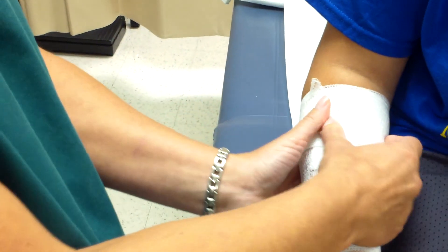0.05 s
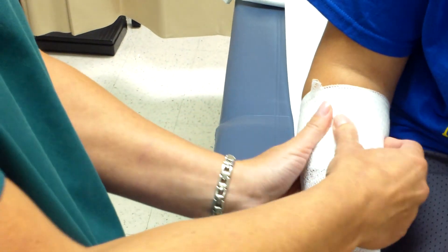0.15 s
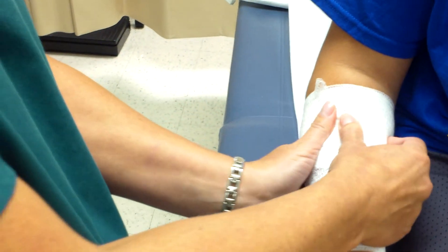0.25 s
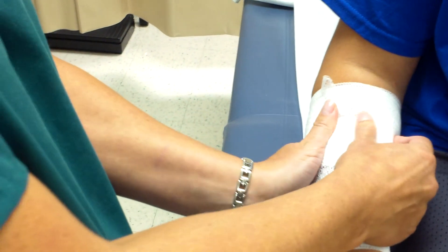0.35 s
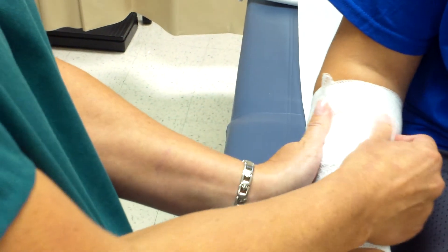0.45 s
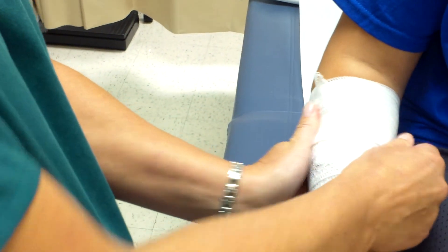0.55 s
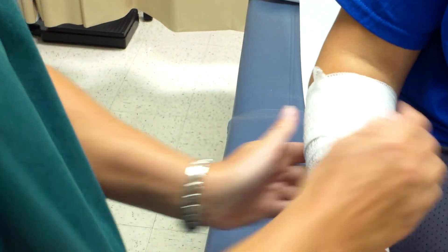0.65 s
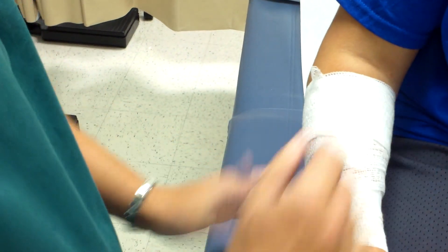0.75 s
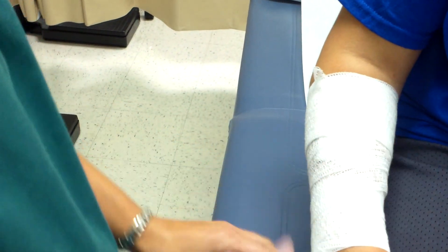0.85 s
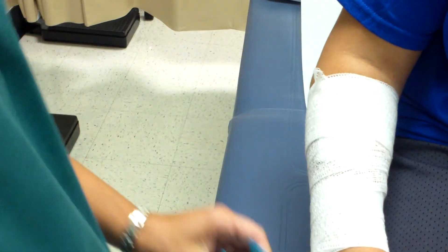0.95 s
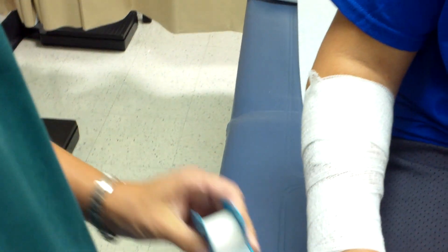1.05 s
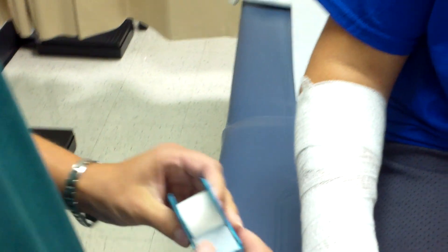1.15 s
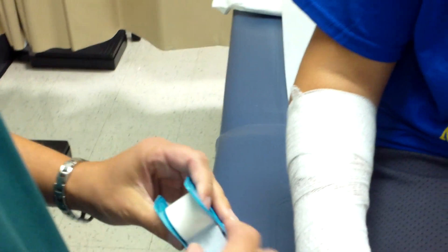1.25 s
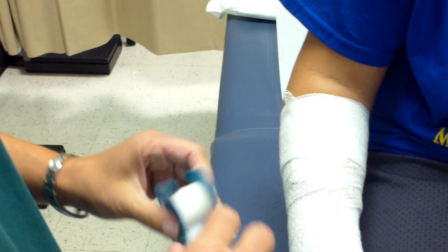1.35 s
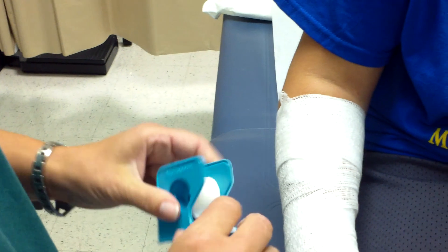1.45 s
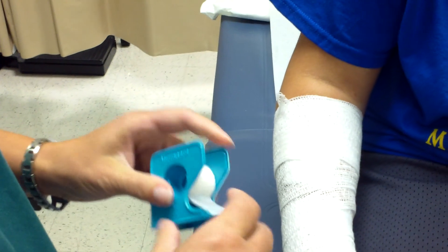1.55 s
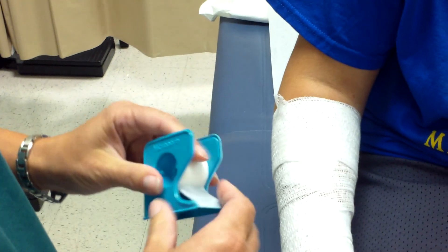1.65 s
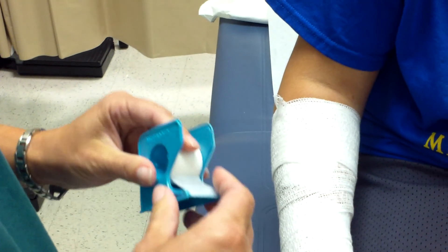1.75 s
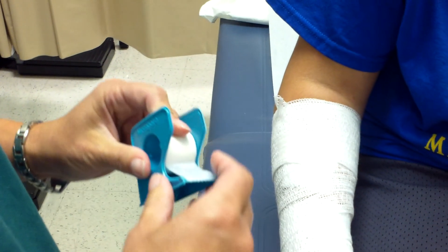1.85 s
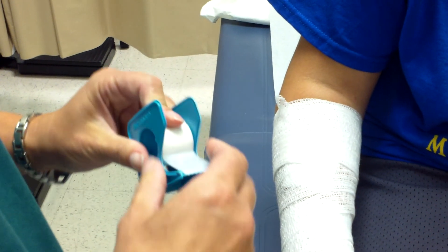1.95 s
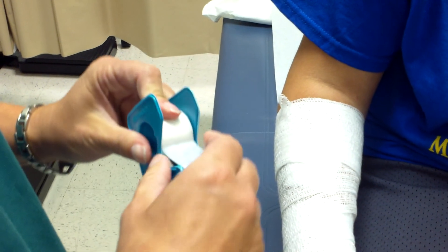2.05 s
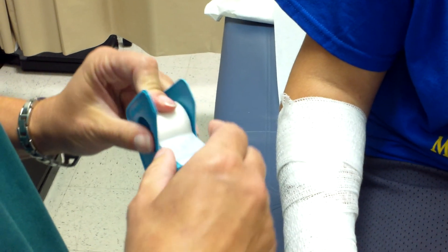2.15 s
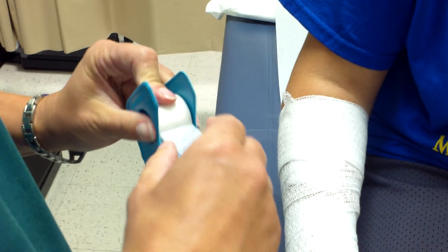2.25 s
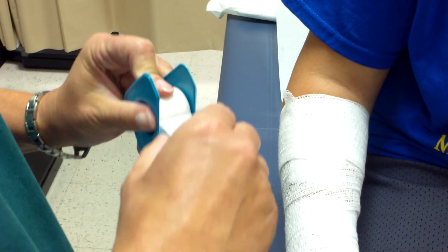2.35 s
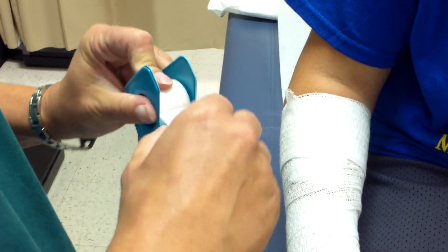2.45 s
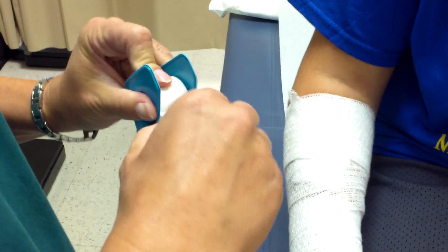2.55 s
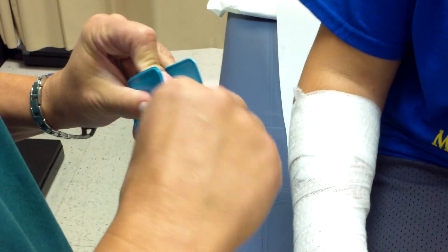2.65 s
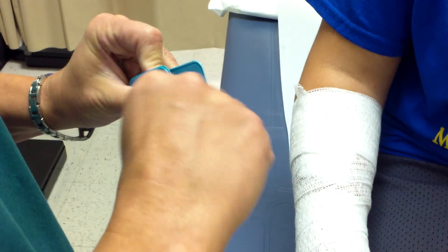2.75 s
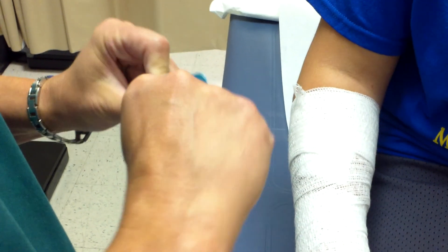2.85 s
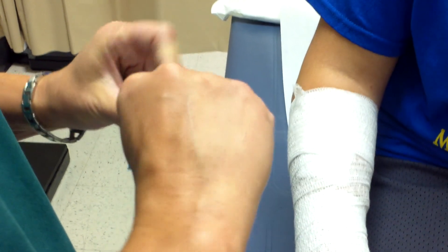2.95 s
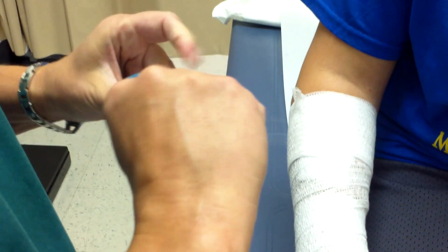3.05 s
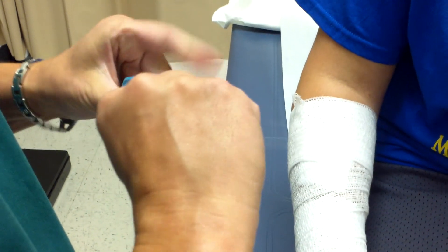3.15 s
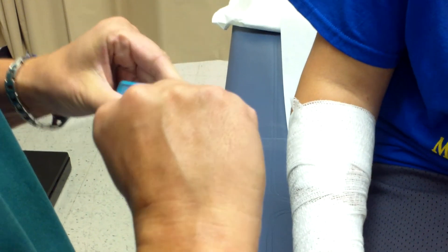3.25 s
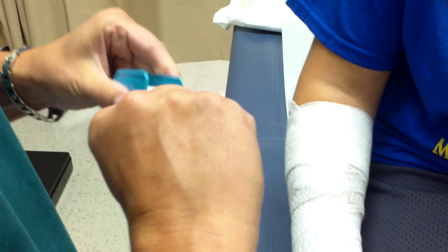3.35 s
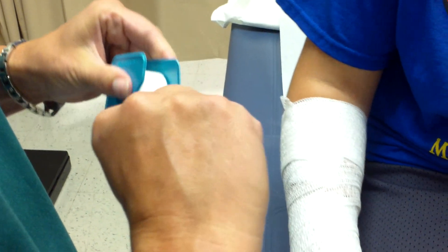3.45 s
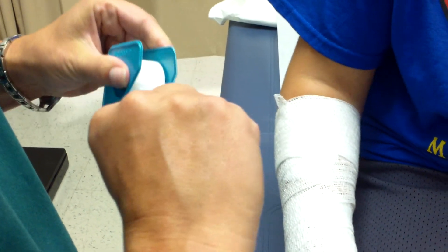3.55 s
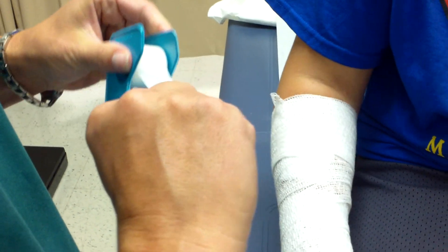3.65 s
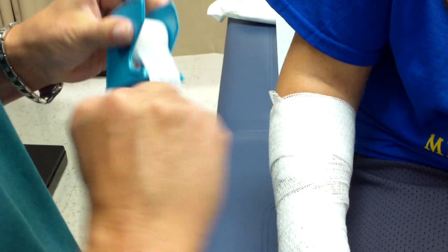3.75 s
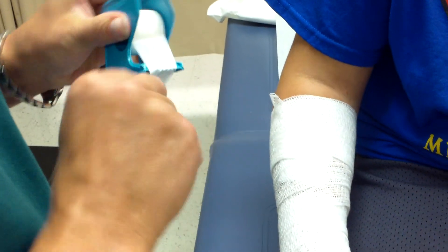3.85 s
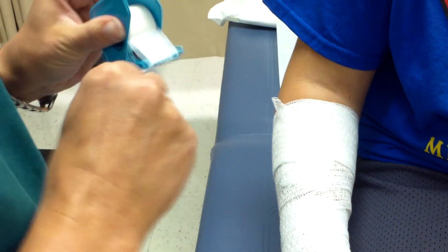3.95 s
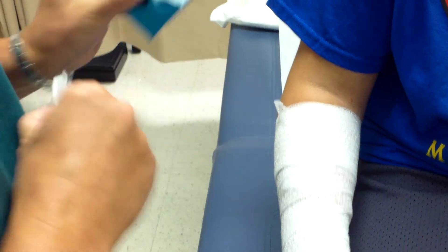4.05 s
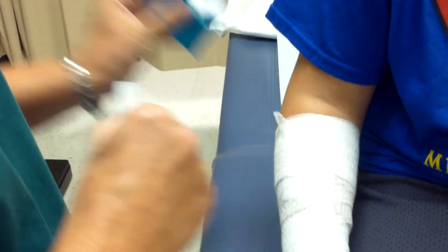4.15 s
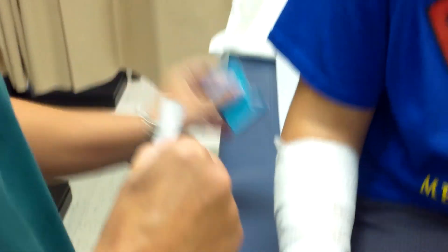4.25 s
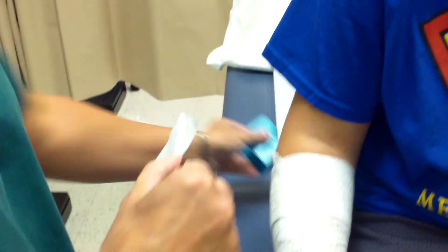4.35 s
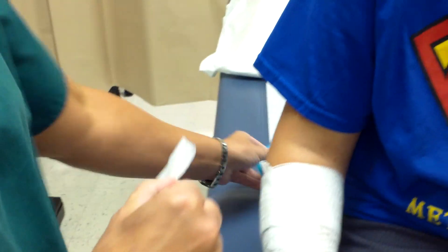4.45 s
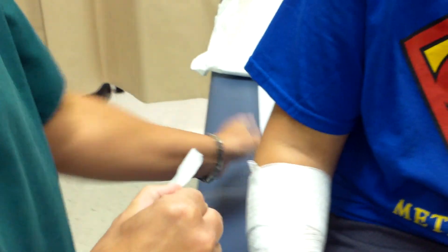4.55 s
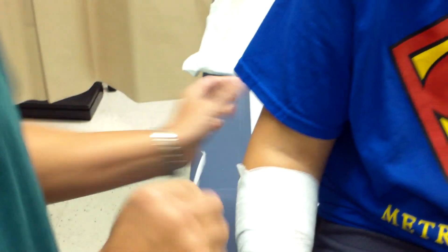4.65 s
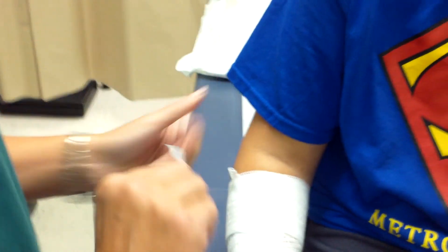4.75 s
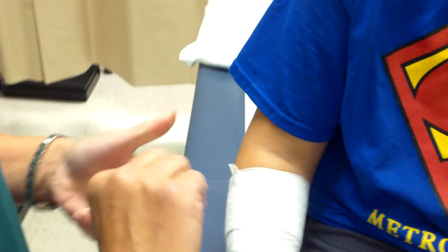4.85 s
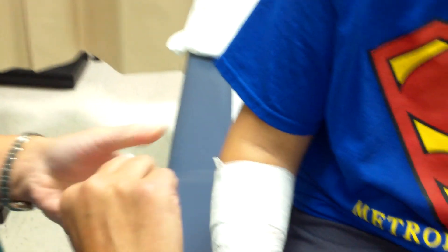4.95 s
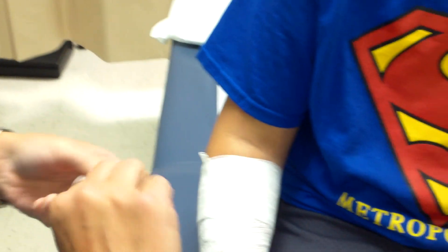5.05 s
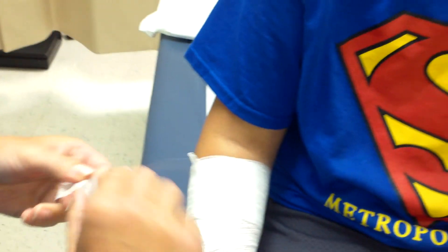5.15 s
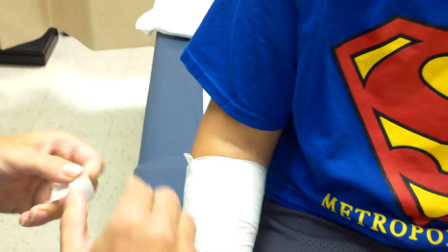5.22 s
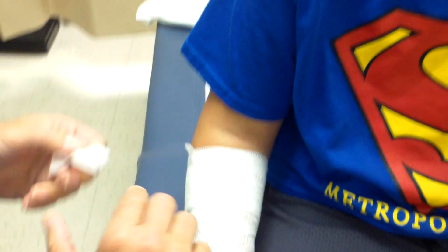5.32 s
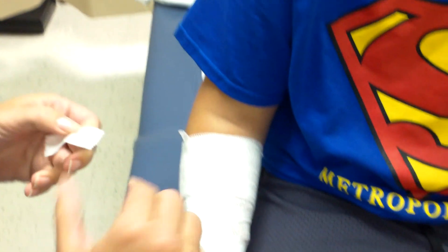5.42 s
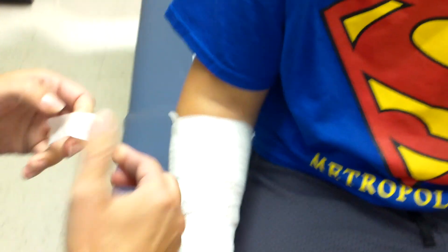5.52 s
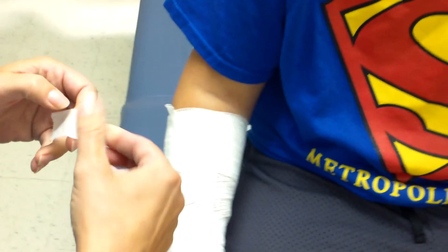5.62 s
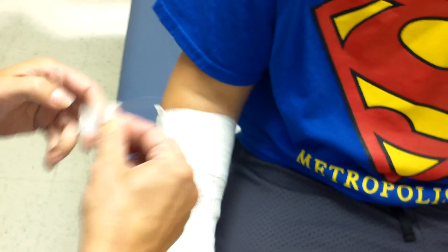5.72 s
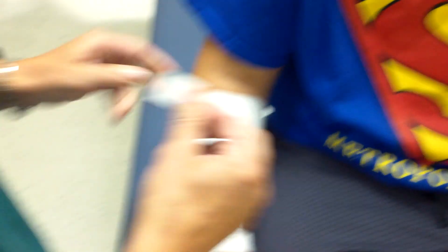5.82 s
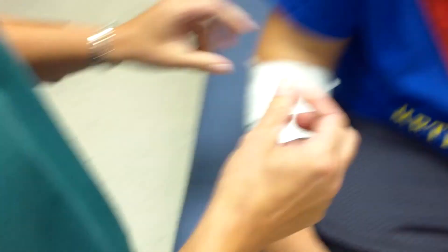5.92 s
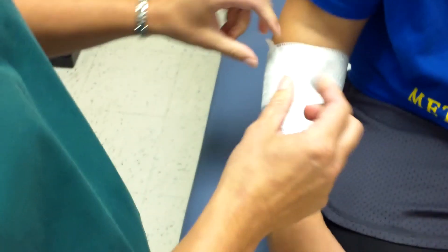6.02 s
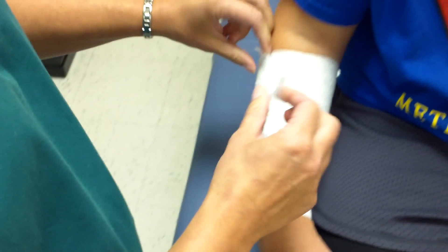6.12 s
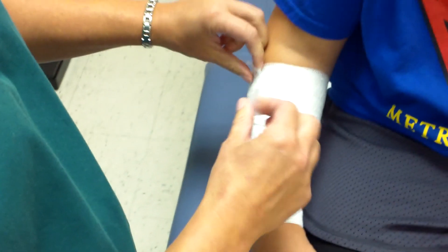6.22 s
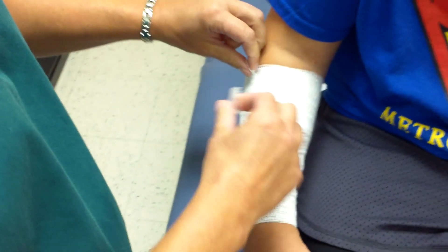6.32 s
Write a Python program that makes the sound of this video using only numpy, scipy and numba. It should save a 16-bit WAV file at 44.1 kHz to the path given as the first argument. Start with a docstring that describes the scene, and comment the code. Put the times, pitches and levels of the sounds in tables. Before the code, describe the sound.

Skin brushes gauze, a plastic dispenser clicks, sticky tape peels in rasping jerks and snaps off, followed by crinkles, scuffs and close dull thumps.

```python
"""Gauze, tape peel and snap

Close hands in a small, quiet, ventilated room: skin strokes gauze, a sleeve swishes, a plastic dispenser clicks.
Adhesive crackles in jerks and shakes the tape span; teeth tear the strip and ring the dispenser body.
Padding scuffs, creases pop, fingers squeak, a hollow thing bumps and dull knocks fall close by.
In mono on a hand-held camera microphone, whose limiter ducks for half a second after the snap."""
import sys
import numpy as np
from scipy import signal
from scipy.fft import rfft, irfft
from scipy.io import wavfile
from scipy.ndimage import uniform_filter1d, minimum_filter1d
from numba import njit

SR = 44100
rng = np.random.default_rng(int(sys.argv[2]) if len(sys.argv) > 2 else 0)


def output_pcm(signal):
    """Save a mono or channel-first signal as 16-bit PCM at the path in sys.argv[1].

    Samples are clipped to [-1, 1] before scaling.
    """
    pcm = np.clip(np.atleast_2d(signal).T, -1, 1) * 32767
    wavfile.write(sys.argv[1], SR, np.round(pcm).astype(np.int16))


N = 281336
TIME = np.arange(N) / SR

# All levels are relative: mixing, colouring and the microphone chain follow.
# Ventilation spectrum: pitch_hz [Hz], level_db [dB per Hz]
VENTILATION_SPECTRUM = [(20, -10.5), (45, -6), (65, -16.5), (125, -12), (200, -15), (400, -22), (700, -26),
                        (1900, -31), (4500, -34), (9500, -38.5), (12000, -41), (16000, -42)]
# low rumble of the microphone chain: pitch_hz [Hz], level_db [dB per Hz]
RUMBLE_SPECTRUM = [(10, -1.5), (25, -5.5), (42, 2.5), (60, -19), (120, -9.5), (400, -46), (2000, -81.5)]
# microphone port resonances: pitch_hz [Hz], width_hz [Hz], level_db [dB]
PORT_RESONANCES = [(6810, 310, 3), (8030, 570, -3.5), (9350, 700, 5)]
# dull knocks: start_s [s], contact_db [dB], thump_db [dB], thump_hz [Hz], ring_db [dB], ring_hz [Hz], t60_s [s]
KNOCKS = [(3.777, -38, -52, 200, -34, 825, 0.023), (4.9436, -34, -48, 198, -10.5, 1445, 0.021),
          (5.2495, -25, -16.5, 247, -11.5, 730, 0.011), (5.3736, -24, -17, 171, -11, 1620, 0.0092),
          (5.505, -25.5, -8.5, 98, -16.5, 1714, 0.02)]
# spectrum of the hollow bump: pitch_hz [Hz], level_db [dB per Hz]
HOLLOW_SPECTRUM = [(80, -11), (200, 1), (320, -14), (430, 7), (560, -10), (800, 5.5), (1300, -3.5),
                   (2500, -15), (6000, -20), (16000, -28)]
# drag of the hollow thing: fastest_s [s], level_db [dB], half_length_s [s]
BUMP_DRAG = [(1.875, -43, .025), (1.96, -44.5, 0.11)]
# scuffs of hands, cloth and dispenser on padding:
# peak_s [s], level_db [dB], rise_s [s], fall_s [s], tilt_db [dB per octave above 800 Hz]
SCUFFS = [(1.878, -42, 0.018, 0.03, -4), (3.775, -43, 0.0068, 0.018, 0), (3.92, -48.5, 0.081, 0.17, -0.5),
          (4.5646, -30, 0.0042, 0.017, 1), (4.576, -32, 0.0053, 0.021, 1.5),
          (4.634, -29.5, 0.00077, 0.0041, -3), (4.66, -26, 0.0035, 0.012, -0.5),
          (4.67, -30, 0.0067, 0.027, -1), (5.765, -34.5, 0.0037, 0.011, 0)]
# padding spectrum: pitch_hz [Hz], level_db [dB per Hz]
PADDING_SPECTRUM = [(60, 8.5), (300, 3), (650, 3.5), (1100, -6), (2000, -1), (4000, -6), (10000, -3.5),
                    (12500, -16.5), (16000, -29.5)]
# the palm strokes the gauze: fastest_s [s], level_db [dB], half_length_s [s], brightness_db [dB above 8 kHz]
GAUZE_STROKES = [(0.033, -50, 0.17, 5), (0.194, -36, 0.019, -4.5), (0.414, -37, 0.035, -6),
                 (0.53, -35, 0.04, 2.5), (0.645, -42, 0.22, 3.5)]
# gauze weave spectrum: pitch_hz [Hz], level_db [dB per Hz]
GAUZE_SPECTRUM = [(1000, -17), (2500, -6.5), (4500, 0.5), (7000, 3), (10000, 2), (12000, -7), (16000, -17)]
# the sleeve swishes as the arm swings: fastest_s [s], level_db [dB], half_length_s [s]
SLEEVE_SWISHES = [(.02, -51, 0.15), (.76, -46, 0.095), (.96, -48.5, 0.092)]
# sleeve cloth spectrum: pitch_hz [Hz], level_db [dB per Hz]
SLEEVE_SPECTRUM = [(150, 6), (600, 3.5), (2000, 4.5), (4000, 2), (8000, -2.5), (16000, -45)]
# fingers shift their grip on dispenser or strip: fastest_s [s], level_db [dB], half_length_s [s]
GRIP_RUBS = [(1.1, -52.5, 0.24), (1.41, -38.5, 0.013), (1.52, -46.5, 0.0089), (1.623, -39.5, 0.018),
             (1.71, -38.5, 0.0082), (1.97, -49.5, 0.18), (2.33, -50.5, 0.16), (2.65, -47.5, 0.029),
             (3.75, -47.5, 0.18), (3.87, -41.5, .022), (3.998, -40.5, 0.022), (4.7, -48.5, 0.2),
             (5.37, -47, 0.06), (5.55, -46, 0.025), (5.77, -45.5, 0.041)]
# skin spectrum: pitch_hz [Hz], level_db [dB per Hz]
SKIN_SPECTRUM = [(300, -40), (1500, 1), (3200, -2), (5000, -4.5), (10000, -0.5), (12000, -5.5),
                 (16000, -31)]
# fingertips squeak on plastic: strongest_s [s], half_length_s [s], pitch_hz [Hz], level_db [dB]
SQUEAKS = [(1.303, 0.073, 3760, -57.5), (1.4, 0.016, 3290, -44), (2.383, .089, 3230, -58)]
# creases popping in the strip: start_s [s], level_db [dB], pitch_hz [Hz, centre]
CRINKLES = [(4.402, -33.5, 9500), (4.8148, -36.5, 9200), (4.8845, -24, 11600), (5.039, -29, 5640),
            (5.107, -20.5, 1550), (5.349, -11.5, 4520), (5.506, -21.5, 4000), (5.5365, -16, 3300),
            (5.7325, -25, 5870), (5.7757, -10.5, 3870)]
# plastic clicks of the dispenser: start_s [s], level_db [dB]
CLICKS = [(0.963, -33), (0.9758, .5), (0.9917, -10), (0.9961, 1.5), (1.414, -24), (1.6037, -23.5),
          (1.6998, -43), (2.2513, -22), (2.301, -29.5), (2.3115, -30), (3.659, -27.5), (3.87, -39)]
# dispenser plastic spectrum: pitch_hz [Hz], level_db [dB per Hz]
PLASTIC_SPECTRUM = [(100, -29), (300, -2), (700, -10), (1500, -8.5), (2600, 0.5), (3400, 2.5), (4100, -2),
                    (4700, -2), (6000, -1), (8000, -12), (11000, -5.5), (16000, -32)]
# ringing modes of the dispenser body: pitch_hz [Hz, cluster centre], level_db [dB], t60_s [s]
SHELL_MODES = [(2230, 11.5, 0.054), (3640, 14, 0.14), (3600, -11.5, 0.31), (3770, -3.5, 0.12),
               (4441, -30.5, 0.31), (6320, -14.5, 0.32), (7601, -22, 0.32), (9550, 1, 0.17),
               (9800, -21.5, 0.27), (10300, -24, 0.16)]
# roll and holder resonances: pitch_hz [Hz], width_hz [Hz], level_db [dB]
HOLDER_RESONANCES = [(2230, 360, -1), (3200, 130, 2), (3860, 150, 2), (4940, 200, -12), (5960, 180, 2),
                     (6500, 200, -4.5), (8820, 180, -2.5), (10060, 220, -6)]
# one pull, a tug then a long draw: time_s [s], crackle_db [dB], span_shake_db [dB]
PEEL_PULL = [(2.83, -55, -65), (2.87, -39.5, -48), (2.965, -36, -39), (3.02, -46, -62), (3.15, -38, -65),
             (3.32, -33.5, -55), (3.41, -33.5, -43), (3.495, -25, -35), (3.54, -36, -29.5),
             (3.62, -50.5, -56)]
# the adhesive lets go in jerks: start_s [s], level_db [dB], span_pluck_db [dB, extra]
PEEL_SLIPS = [(2.4976, -43, 9.5), (2.5315, -37.5, 3.5), (2.5684, -25.5, -6), (2.6051, -24.5, -11),
              (2.9221, -16, 11), (2.9354, -15.5, 3), (2.943, -20, 0), (2.9551, -15, 9.5), (2.963, -18, 0),
              (3.0564, -19.5, -2), (3.073, -18, -18), (3.0885, -13.5, -36), (3.173, -12.5, -2.5),
              (3.227, -17.5, -17), (3.2596, -25, -3), (3.3, -13, -25), (3.4248, -19, 5), (3.4666, -16, -2),
              (3.489, -15, -2)]
# adhesive spectrum: pitch_hz [Hz], level_db [dB per Hz]
ADHESIVE_SPECTRUM = [(100, 4), (400, -7.5), (900, -8), (2200, -1), (3300, -0.5), (6000, -0.5), (10000, 1.5),
                     (12000, -5.5), (16000, -12)]
# the free span of tape rings lower overall as it lengthens: time_s [s], pitch_hz [Hz]
SPAN_PITCH = [(2.5, 2280), (2.65, 2130), (2.74, 1920), (2.95, 1970), (3.2, 1420), (3.42, 1050), (3.49, 840),
              (3.55, 686)]
# modes of the free span: multiple [of span pitch], width_share [of mode pitch], level_db [dB]
SPAN_MODES = [(1, 0.088, 18), (1.17, 0.063, 9.5), (1.6, 0.1, 4.5), (.56, 0.064, 9)]
# the span creaks under tension: strongest_s [s], level_db [dB], half_length_s [s]
SPAN_CREAKS = [(2.706, -40.5, 0.0048), (2.743, -38, 0.01), (2.818, -45, 0.0039)]
# patches of tape near the peel line: pitch_hz [Hz], width_hz [Hz]
PEEL_PATCHES = [(2900, 50), (4600, 400), (6500, 120), (9800, 850)]
# the tape parts tooth by tooth, then its end flicks back: start_s [s], level_db [dB], length_s [s]
TEAR_BURSTS = [(4.011, -5, 0.0029), (4.014, 2, 0.0027), (4.0162, 6.5, .003), (4.0201, 0, 0.0035),
               (4.0357, -2.5, .0016)]
# cutting teeth spectrum: pitch_hz [Hz], level_db [dB per Hz]
TEETH_SPECTRUM = [(100, -45), (300, -19.5), (850, -3), (1400, -7), (2200, 6), (2700, -7), (3500, 3.5),
                  (4900, -2), (5800, -7), (10300, 0), (12000, -12), (16000, -23)]

GESTURE_SHAPE = 1.5  # exponent of a symmetrical swell: 1 is pointed, 2 is a bell
FREE_HANDS_S = 4.47  # the dispenser is down: the strip rustles and the arms stir the air
STRIP_DB, DRAUGHT_DB = -57.5, -47
BUMP_S = 1.9285
# the loose roll chatters around each click, at a level relative to it
CHATTER_DB, CHATTER_S, CHATTER_PER_S = -23.5, 0.01, 910
# smaller random jerks: mean rate, and level over the pull's crackle
SMALL_SLIPS_PER_S, SMALL_SLIP_DB = 40, 10
# threads crackle around each listed jerk: level relative to it, build-up and fading times
SLIP_CRACKLE_DB, BEFORE_SLIP_S, AFTER_SLIP_S = -23, 0.002, 0.017
TOP_HZ = 16000  # edge of the microphone chain's low-pass


def undb(db):
    """Decibels to gain."""
    return 10 ** (np.asarray(db) / 20)


def unit(x):
    """Scale to rms 1."""
    return x / np.sqrt(np.mean(x ** 2))


def swell(rows, axis=1):
    """Gain along a dB curve, with 10 ms fades to nothing outside it."""
    rows = np.array(rows)
    first, last = rows[0, 0], rows[-1, 0]
    inside = np.interp(TIME, [first - 0.01, first, last, last + 0.01], [0, 1, 1, 0])
    return inside * undb(np.interp(TIME, rows[:, 0], rows[:, axis]))


def gestures(rows):
    """Gain of movements that speed up and slow down alike; their powers add."""
    power = 0
    for fastest_s, level_db, half_length_s in rows:
        distance = np.abs((TIME - fastest_s) / half_length_s)
        power = power + undb(2 * level_db) * np.exp(-2 * distance ** GESTURE_SHAPE)
    return np.sqrt(power)


def free_hands(rise_s=0.053):
    """Gain that comes up once the dispenser is put down."""
    return 1 - np.exp(-np.maximum(TIME - FREE_HANDS_S, 0) / rise_s)


def flicker(rate, depth_db):
    """A gain that wanders between random dB values, rate of them a second."""
    knots = rng.standard_normal(4096)
    return undb(depth_db * np.interp(TIME * rate, np.arange(len(knots)), knots))


def response(points, size=4096):
    """Minimum-phase impulse response of unit energy with the given spectrum."""
    hz, db = np.transpose(points)
    f = np.maximum(np.fft.rfftfreq(size, 1 / SR), 1)
    cepstrum = irfft(np.log(undb(np.interp(np.log(f), np.log(hz), db))))
    # folding the cepstrum forward makes the response causal
    cepstrum[1:size // 2] *= 2
    cepstrum[size // 2 + 1:] = 0
    h = irfft(np.exp(rfft(cepstrum)))
    return h / np.linalg.norm(h)


def through(x, h):
    """Pass a sound through an impulse response."""
    return signal.fftconvolve(x, h)[:N]


@njit
def ring_down(x, pole):
    """One complex pole that may change with every sample."""
    y, z = np.empty(len(x)), 0j
    for i in range(len(x)):
        z = z * pole[i] + x[i]
        y[i] = z.real
    return y


def resonate(x, hz, width_hz):
    """A resonance of about gain 1 whose centre and width may move."""
    pole = np.exp(np.pi * (2j * hz - width_hz) / SR) * np.ones(N)
    return ring_down(2 * (1 - np.abs(pole)) * x, pole)


def noise(points):
    """Noise of rms 1 with the given spectrum."""
    return unit(through(rng.standard_normal(N), response(points)))


def grains(points, per_s, spread_db):
    """Tiny fibres letting go at random, a few much larger than the rest."""
    size = undb(spread_db * np.minimum(rng.exponential(size=N), 4))
    happens = rng.random(N) < per_s / SR
    ticks = happens * size * rng.choice([-1, 1], N)
    return unit(through(ticks, response(points)))


def crack(fall_s, tail_db, tail_s, size=4096):
    """A sharp burst of micro-fractures over a weaker, longer rattle."""
    t = TIME[:size]
    shape = np.exp(-t / fall_s) + undb(tail_db) * np.exp(-t / tail_s)
    return rng.choice([-1, 1], size) * shape


def add(out, s, x):
    """Mix a short sound in at time s."""
    i = int(s * SR)
    out[i:i + len(x)] += x[:N - i]


def ventilation():
    """The room's ventilation: steady noise, strongest in the bass."""
    return undb(-48.0) * noise(VENTILATION_SPECTRUM)


def draught():
    """Arms stir the air at the microphone: low noise once the hands are free."""
    air = noise([(15, 1), (40, 6.5), (120, -2.0), (300, -12.5), (1000, -17.5), (4000, -67)])
    return air * free_hands() * undb(DRAUGHT_DB)


def room(x, early_db=-14.5, early_s=0.0025, tail_db=-19.0, t60=0.28):
    """A scatter of early echoes from the hands and arm, then a short, soft reverberation."""
    t = TIME[:SR // 2]
    early = rng.standard_normal(len(t)) * t * np.exp(-2 * t / early_s)
    tail = rng.standard_normal(len(t)) * np.exp(-np.log(1000) * t / t60)
    tail *= 1 - np.exp(-t / early_s)
    early *= undb(early_db) / np.linalg.norm(early)
    tail *= undb(tail_db) / np.linalg.norm(tail)
    return x + through(x, early + tail)


def bump():
    """Something hollow is dragged a little and knocked, with a light tick on contact."""
    drag = noise([(80, -18), (200, 7.5), (330, -3.5), (800, -16), (3000, -34)])
    out = drag * gestures(BUMP_DRAG)
    blow = crack(fall_s=0.0029, tail_db=-8.5, tail_s=0.032, size=16384)
    add(out, BUMP_S, undb(-28) * through(blow, response(HOLLOW_SPECTRUM)))
    tick_colour = response([(200, -23), (850, 7), (1500, 4), (3000, -12), (9000, -21), (16000, -32)])
    tick = crack(fall_s=0.0014, tail_db=-10, tail_s=0.013)
    add(out, BUMP_S, undb(-34.5) * through(tick, tick_colour))
    return out


def knocks():
    """A soft blow gives a brief contact rub, one heavy swing of pressure and a short hollow ring."""
    out, t = np.zeros(N), TIME[:SR // 10]
    contact_colour = response([(100, 4), (700, -0.5), (1900, -5), (2700, -20.5), (8000, -30), (16000, -36)])
    for start_s, contact_db, thump_db, thump_hz, ring_db, ring_hz, t60_s in KNOCKS:
        thump = np.cos(2 * np.pi * thump_hz * t) * np.exp(-t * thump_hz * 2.0)
        thump *= 1 - np.exp(-t / 0.001)
        fade = np.exp(-np.log(1000) * t / t60_s)
        ring = np.sin(2 * np.pi * ring_hz * t) * fade
        # a second, higher mode dies twice as fast and broadens the attack
        ring += 2.4 * np.sin(2 * np.pi * ring_hz * 1.076 * t) * fade ** 2
        ring *= (1 - np.exp(-t / 0.0011)) ** 2
        add(out, start_s, undb(thump_db) * thump + undb(ring_db - 2) * ring)
        contact = through(crack(fall_s=0.0016, tail_db=-12, tail_s=0.012), contact_colour)
        add(out, start_s, undb(contact_db) * contact)
    return out


def scuffs():
    """Short rubs on padding: noise that swells and fades, its treble tilted for each rub."""
    out = np.zeros(N)
    t = TIME[:SR // 2] - 0.1  # leaves room for the rise before the peak
    for peak_s, level_db, rise_s, fall_s, tilt_db in SCUFFS:
        shape = np.exp(-np.maximum(-t / rise_s, t / fall_s))
        tilted = [(hz, db + tilt_db * np.log2(max(hz / 800, 1))) for hz, db in PADDING_SPECTRUM]
        rub = through(shape * rng.standard_normal(len(t)), response(tilted))
        add(out, peak_s + t[0], undb(level_db) * rub)
    return out


def sleeve():
    """Cloth swishes along with the arm: coloured noise following its speed."""
    return noise(SLEEVE_SPECTRUM) * gestures(SLEEVE_SWISHES) * undb(1)


def gauze():
    """Skin drags over the weave, plucking many fibres; each stroke has its own brightness."""
    weave = grains(GAUZE_SPECTRUM, per_s=14000, spread_db=4)
    weave = weave * flicker(rate=82, depth_db=0.7) * undb(-6.5)
    high_pass = signal.butter(4, 8000, "high", fs=SR, output="sos")
    treble = signal.sosfiltfilt(high_pass, weave)
    out = np.zeros(N)
    for fastest_s, level_db, half_length_s, brightness_db in GAUZE_STROKES:
        stroke = weave + (undb(brightness_db) - 1) * treble
        out += stroke * gestures([(fastest_s, level_db, half_length_s)])
    return out


def holder(x):
    """Part of the sound comes straight, the rest through the resonances of the plastic."""
    coloured = sum(undb(db) * resonate(x, hz, width) for hz, width, db in HOLDER_RESONANCES)
    return undb(-5.5) * x + undb(-6) * coloured


def grip():
    """Skin grains rub on plastic and tape, then rustle the strip in free hands."""
    strength = np.hypot(gestures(GRIP_RUBS), undb(STRIP_DB) * free_hands())
    skin = holder(grains(SKIN_SPECTRUM, per_s=1200, spread_db=0.5))
    return skin * flicker(rate=64, depth_db=4.0) * strength * undb(-0.5)


def squeaks():
    """Fingertips squeak faintly on plastic: noise narrowed by a single resonance."""
    out = np.zeros(N)
    for strongest_s, half_length_s, pitch_hz, level_db in SQUEAKS:
        tone = unit(resonate(rng.standard_normal(N), pitch_hz, width_hz=190))
        out += tone * gestures([(strongest_s, level_db, half_length_s)])
    return out


def crinkles():
    """Each crease pops once, with its own broad colour."""
    out = np.zeros(N)
    for start_s, level_db, hz in CRINKLES:
        colour = response([(hz / 10, -22), (hz / 2, -5), (hz, 0), (hz * 2, -6), (hz * 4, -20)])
        pop = through(crack(fall_s=0.00071, tail_db=-16.0, tail_s=0.0011), colour)
        add(out, start_s, undb(level_db - 3.5) * pop)
    return out


def shell(force):
    """The dispenser's plastic body rings on after a blow; each mode is a close cluster."""
    t, h = TIME[:SR // 2], 0
    for pitch_hz, level_db, t60_s in SHELL_MODES:
        cluster_hz = pitch_hz + rng.uniform(-130, 130, size=(6, 1))
        cluster = np.sin(2 * np.pi * cluster_hz * t).sum(axis=0)
        h = h + undb(level_db) * cluster * np.exp(-np.log(1000) * t / t60_s)
    return through(force, h / np.linalg.norm(h))


def dispenser():
    """The roll knocks and chatters in its plastic holder, and the body rings."""
    ticks = unit((rng.random(N) < CHATTER_PER_S / SR) * rng.standard_normal(N))
    force = ticks * gestures([(s, db + CHATTER_DB, CHATTER_S) for s, db in CLICKS])
    for start_s, level_db in CLICKS:
        add(force, start_s, undb(level_db) * crack(fall_s=0.0013, tail_db=-22, tail_s=0.0061))
    return undb(-8) * through(force, response(PLASTIC_SPECTRUM)) + undb(-18.5) * shell(force)


def small_slips(pluck_db=-6):
    """Jerks at random moments of the pull, their level following it; rows like PEEL_SLIPS."""
    s, db, _ = np.transpose(PEEL_PULL)
    happens = rng.random(N) < SMALL_SLIPS_PER_S / SR
    moments = TIME[happens & (TIME > s[0]) & (TIME < s[-1])]
    return [(at, np.interp(at, s, db) + SMALL_SLIP_DB, pluck_db) for at in moments]


def slip_crackle():
    """Gain of the threads straining before each listed jerk and settling after it."""
    gain = np.zeros(N)
    for start_s, level_db, _ in PEEL_SLIPS:
        distance = np.maximum((start_s - TIME) / BEFORE_SLIP_S, (TIME - start_s) / AFTER_SLIP_S)
        gain += undb(level_db + SLIP_CRACKLE_DB) * np.exp(-distance)
    return gain


def tape_span(drive):
    """The free span resonates to the peeling; unsteady tension makes its pitch waver."""
    span_hz = np.interp(TIME, *np.transpose(SPAN_PITCH)) * flicker(rate=59, depth_db=0.5)
    out = np.zeros(N)
    for multiple, width_share, level_db in SPAN_MODES:
        mode_hz = multiple * span_hz
        out += undb(level_db) * resonate(drive, mode_hz, width_share * mode_hz)
    return out


def peeling():
    """Threads of adhesive snap, steadily and in jerks, and shake the lengthening span of tape."""
    threads = grains(ADHESIVE_SPECTRUM, per_s=1400, spread_db=1.0) * undb(-5.0)
    creaks = gestures(SPAN_CREAKS)
    direct = threads * (np.hypot(swell(PEEL_PULL), slip_crackle()) + undb(-14) * creaks)
    drive = threads * (swell(PEEL_PULL, axis=2) + creaks)
    colour = response(ADHESIVE_SPECTRUM)
    for start_s, level_db, pluck_db in list(PEEL_SLIPS) + small_slips():
        jerk = through(crack(fall_s=0.0015, tail_db=-14, tail_s=0.011), colour)
        jerk *= undb(level_db - 11.5)
        add(direct, start_s, jerk)
        add(drive, start_s, undb(pluck_db) * jerk)
    # the peel line wanders, so every few snaps have a colour of their own
    patches = sum(resonate(direct, hz * flicker(rate=45, depth_db=1.1), width) for hz, width in PEEL_PATCHES)
    return holder(direct) + undb(-1.5) * patches + tape_span(drive)


def tearing(tail_db=-25, tail_s=0.027):
    """The taut tape rips over the teeth in abrupt bursts with weak tails, and rings the body."""
    force, t = np.zeros(N), TIME[:SR // 10]
    for start_s, level_db, length_s in TEAR_BURSTS:
        shape = np.exp(-(t / length_s) ** 4) + undb(tail_db) * np.exp(-t / tail_s)
        add(force, start_s, undb(level_db) * shape * rng.choice([-1, 1], len(t)))
    return undb(-6.5) * through(force, response(TEETH_SPECTRUM)) + undb(-29) * shell(force)


def scene():
    """Hands, tape and bump in the room; knocks close by, ventilation and draught stay dry."""
    handling = gauze() + sleeve() + grip() + squeaks() + scuffs() + crinkles()
    tape = dispenser() + peeling() + tearing()
    return (room(handling + tape + bump()) + knocks() + ventilation() + draught())[None]


def limiter(x, ceiling_db, hold_s, release_s):
    """Gain falls at once on a loud peak, holds, then comes back quickly."""
    envelope = np.sqrt(np.abs(uniform_filter1d(x ** 2, size=128)) + 1e-12)
    need = np.minimum(undb(ceiling_db) / envelope, 1)
    hold = int(hold_s * SR) | 1  # odd, so the window can look wholly backwards
    held = minimum_filter1d(need, hold, origin=hold // 2)
    pole = np.exp(-1 / (release_s * SR))
    released = 1 - signal.lfilter([1 - pole], [1, -pole], 1 - held)
    return x * np.minimum(held, released)


def record(dry):
    """Microphone port, limiter, soft clipping, low rumble and low-pass; both channels alike."""
    f = np.fft.rfftfreq(N, 1 / SR)
    port_db = sum(db * np.exp(-((f - hz) / width) ** 2) for hz, width, db in PORT_RESONANCES)
    ported = irfft(rfft(dry[0]) * undb(port_db), N)
    limited = limiter(ported, ceiling_db=-8.0, hold_s=0.52, release_s=0.031)
    x = np.tanh(limited) + undb(-51.5) * noise(RUMBLE_SPECTRUM)
    x = signal.sosfilt(signal.ellip(8, 0.2, 70, TOP_HZ, fs=SR, output="sos"), x)
    return np.array([x, x])


dry = scene()
out = record(dry)
output_pcm(out)
```